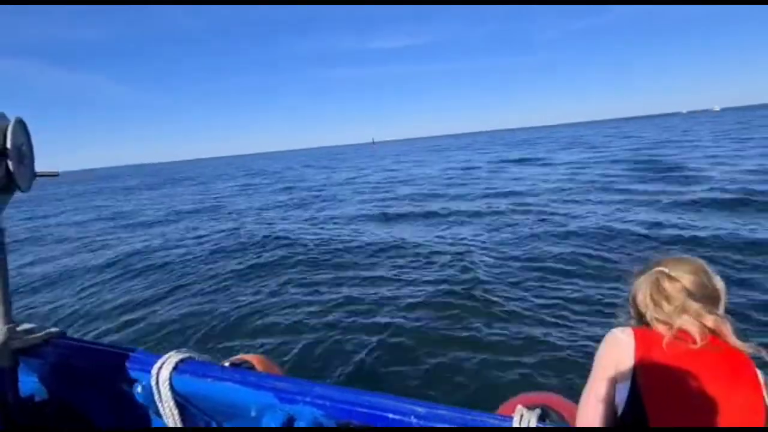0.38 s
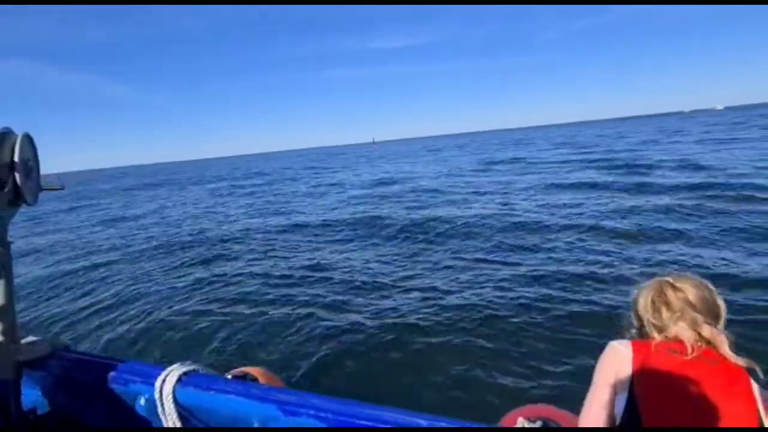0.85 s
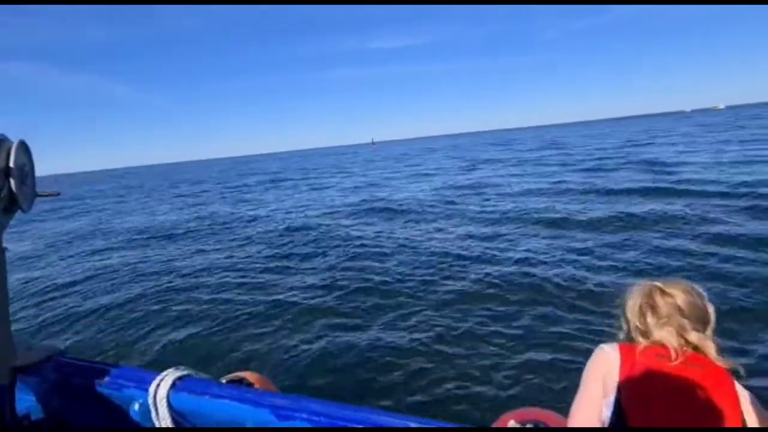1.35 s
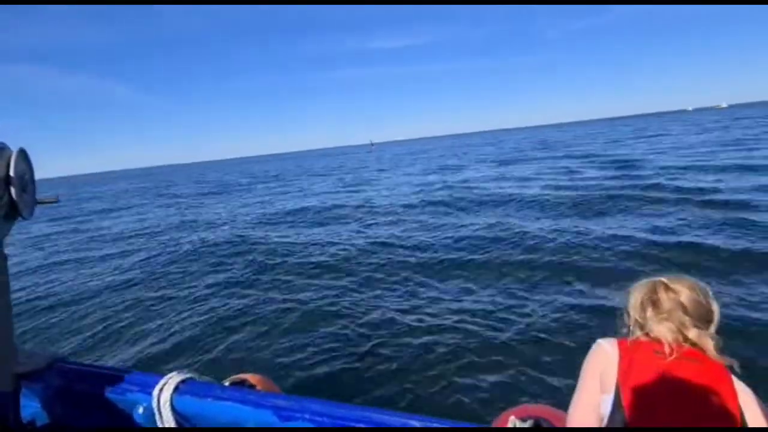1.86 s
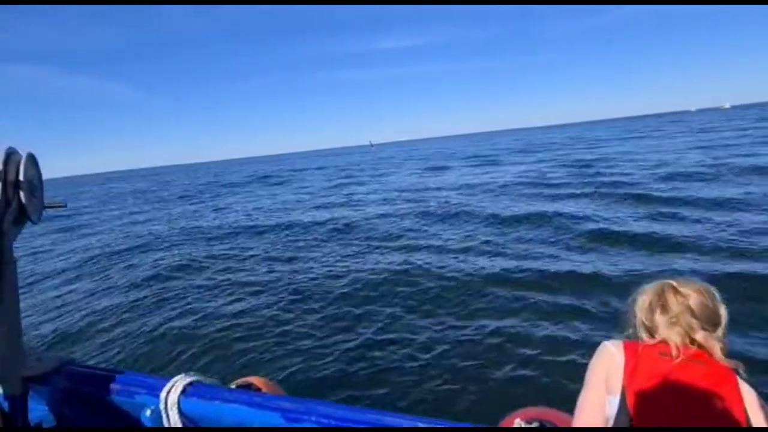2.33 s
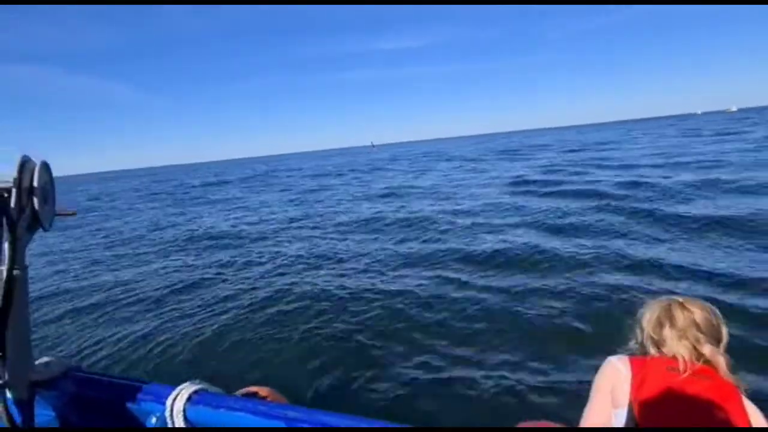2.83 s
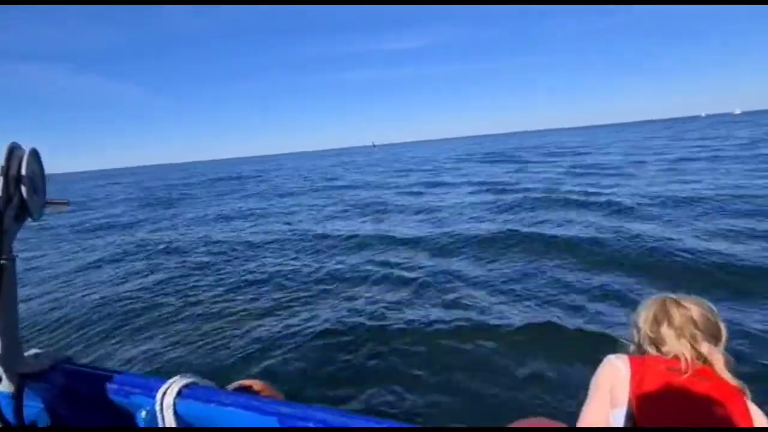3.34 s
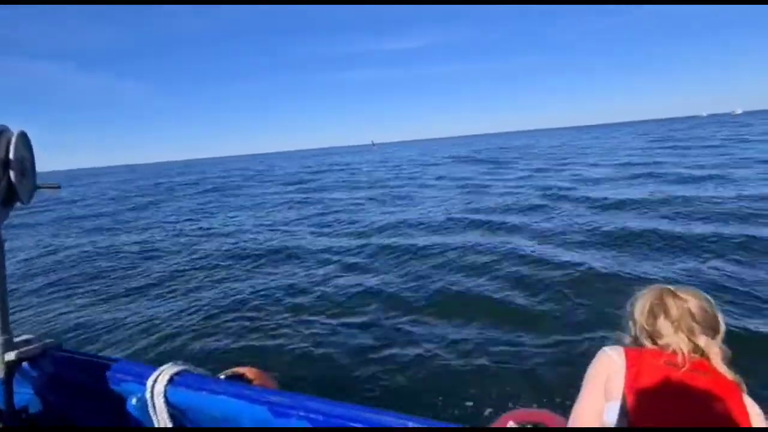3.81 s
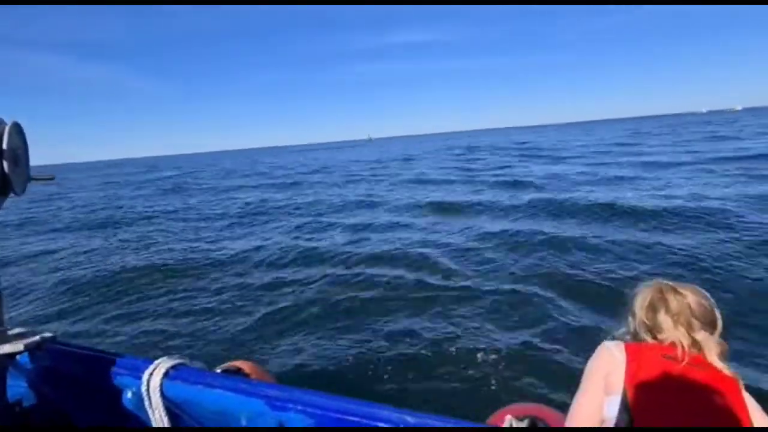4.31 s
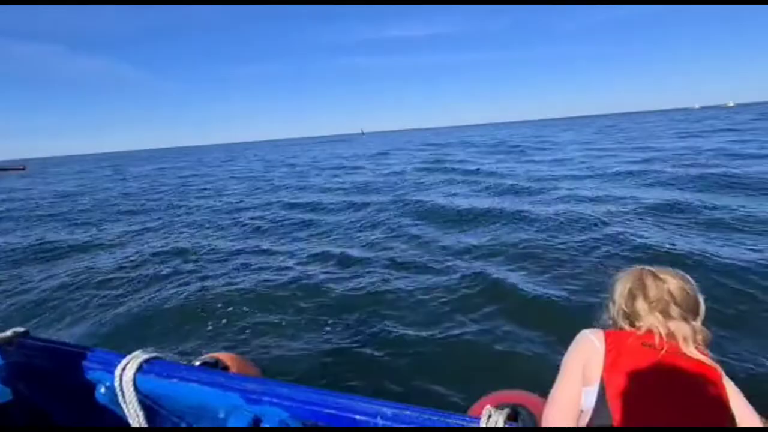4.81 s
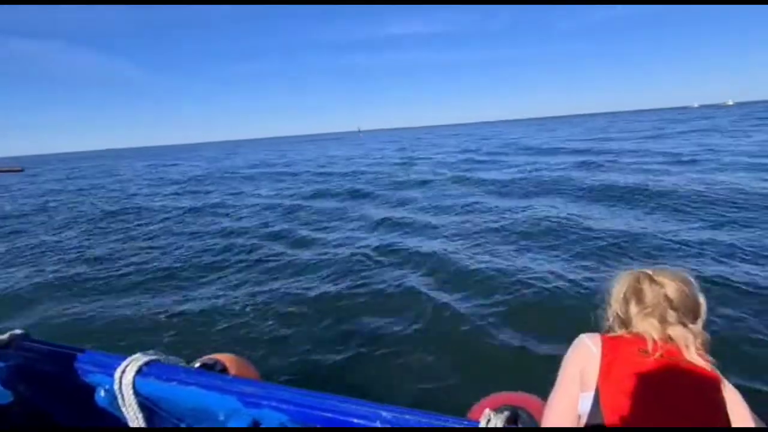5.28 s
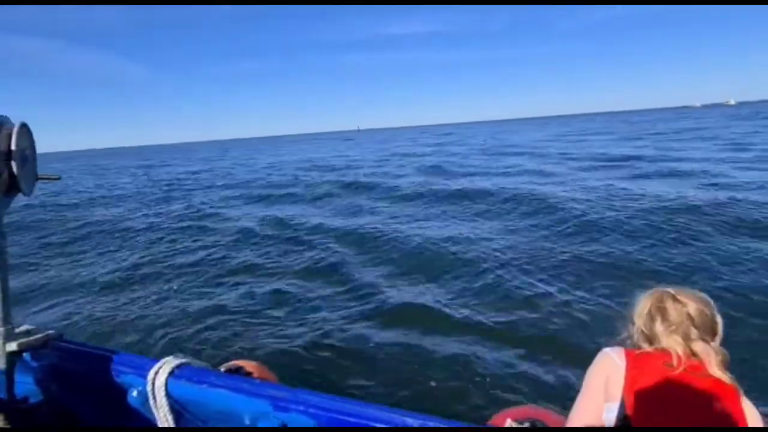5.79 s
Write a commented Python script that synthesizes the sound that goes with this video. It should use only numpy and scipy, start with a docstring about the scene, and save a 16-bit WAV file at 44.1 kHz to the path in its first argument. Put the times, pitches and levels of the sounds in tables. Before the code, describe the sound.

A small diesel engine runs without a break in an open boat at sea. Its fast, even firing merges into a buzzing low-mid drone with a slightly uneven pattern from cylinder to cylinder. Fine metallic valve clatter and a thin air hiss pulse along with it, and soft water and wind rumble lies underneath. The speed sags very slightly towards the end. Close stereo microphone aboard, outdoors and dry, brighter noise leaning right.

```python
"""Diesel in an open boat

A four-cylinder four-stroke diesel runs near 1240 rpm in an open boat on calm sea, slowly losing speed.
Each firing strikes damped modes of the block, exhaust and hull; valve clatter (noise and metal ticks) and
air hiss (noise) pulse in step with the firings. Water and wind rumble softly below, as flickering band noise,
over a soft mid-frequency noise floor. The engine sits nearer the right microphone port."""
import sys
import numpy as np
from scipy import signal
from scipy.io import wavfile

SR = 44100
rng = np.random.default_rng(int(sys.argv[2]) if len(sys.argv) > 2 else 0)


def invert_db(level):
    """Linear amplitude ratio for a level in decibels (20 dB per decade), elementwise."""
    return 10 ** (np.asarray(level, dtype=float) / 20)


def wav_out(sig):
    """Save sig, one row per channel (or a flat mono array), as 16-bit PCM at SR to the path in sys.argv[1]."""
    wavfile.write(sys.argv[1], SR, np.round(np.clip(np.atleast_2d(sig).T, -1, 1) * 32767).astype(np.int16))


N = 260631

# crankshaft speed: (time [s], speed [rpm])
CRANK_SPEED = [(0.0, 1243.49), (1.0, 1246.87), (2.0, 1246.43), (3.0, 1237.11), (4.0, 1226.71),
               (5.0, 1218.11), (5.91, 1205.46)]
PORT_SIGNS = np.array([[1], [-1]])  # left, right


def rms_one(x):
    """Normalisation: divide a signal by its root mean square."""
    return x / np.sqrt(np.mean(x ** 2) + 1e-20)


def in_time(rows):
    """Linear interpolation: columns of a time curve, one value per sample."""
    time_s, *columns = np.transpose(rows)
    return [np.interp(np.arange(N) / SR, time_s, column) for column in columns]


def at_hz(points, hz):
    """Interpolation on a log-frequency axis, as hearing spaces pitch."""
    points_hz, values = np.array(points).T
    return np.interp(np.log(hz), np.log(points_hz), values)


def drift(rate_hz):
    """Low-passed noise: a slow random fluctuation of spread 1, made at every 40th sample."""
    pole = np.exp(-2 * np.pi * rate_hz * 40 / SR)
    noise = rng.standard_normal(N // 40 + 2002)
    slow = signal.lfilter([1], [1, -2 * pole, pole * pole], noise)[2000:]
    return np.interp(np.arange(N) / 40, np.arange(len(slow)), rms_one(slow))


def pan_gains(difference_db):
    """Level difference between ports: half the decibels to the left, minus half to the right."""
    return invert_db(difference_db * PORT_SIGNS / 2)


def firings():
    """Phase integrates speed: cycles since the start; sample and cylinder of each firing, 1 s run-in first."""
    first_firing = .1247  # share of the two-turn cycle
    start_rpm = CRANK_SPEED[0][1]
    rpm = np.r_[np.full(SR, start_rpm), in_time(CRANK_SPEED)[0]]
    # a four-stroke cycle takes two turns, hence 120
    cycles = (np.cumsum(rpm) - SR * start_rpm) / SR / 120
    stroke = np.floor(4 * (cycles - first_firing)).astype(int)
    at = np.flatnonzero(np.diff(stroke)) + 1
    return cycles[SR:], at, stroke[at] % 4


def ring(clicks, hz, t60_s):
    """Damped resonator: a unit click sets off a decaying sine of starting height 1."""
    radius, turn = invert_db(-60 / (t60_s * SR)), 2 * np.pi * hz / SR
    poles = [1, -2 * radius * np.cos(turn), radius * radius]
    return signal.lfilter([0, np.sin(turn)], poles, clicks + 1e-18)


def engine(at, cylinder):
    """Modal excitation: each firing drives every mode by its shape at that cylinder; no two burns are alike."""
    # modes of hull and exhaust: (frequency [Hz], decay time t60 [s], level before the boost [dB],
    # drift as the boat swings [dB per s], left minus right [dB], then mode shape at cylinders 1 to 4 [-])
    hull_modes = [(40.9, 0.59, -34, 0.06, 4, 0.78, 0.56, 1.0, 0.025),
                  (80.5, 0.18, -19, -0.7, 0.5, 0.45, 0.57, 0.65, 0.94),
                  (144.4, 0.096, -16.0, 0, -2, -0.98, -0.79, -0.68, -0.57),
                  (157.7, 0.31, -23.5, 0.4, 0, 0.93, -0.022, 0.94, -0.025),
                  (168.86, 0.37, -18.5, 0.3, -0.8, 0.52, 0.88, 0.39, 0.41),
                  (207, 0.077, -10.5, -0.21, -1, 0.84, 0.78, 0.66, 1.0),
                  (231.5, 0.14, -17, -0.13, -0.5, -0.86, 1, 0.015, -0.77),
                  (251, 0.56, -36, 1.53, 8.5, 1.0, 0.37, 0.89, 0.47),
                  (261.6, 0.16, -16, 1.2, -0.2, -1.06, -0.52, -0.64, -0.5),
                  (278.6, 0.048, -12, 1, 0, 1.0, -0.21, -0.024, 0.06),
                  (293.1, 0.18, -25, 2, 3, -1.22, -0.17, -0.35, -0.52),
                  (341.04, 0.19, -14.5, -1.41, 9, 0.89, -0.36, 0.91, -0.63),
                  (346.7, 0.13, -9.5, -0.25, 2.5, -0.78, 0.36, -1.04, 0.74),
                  (372.4, 0.13, -16.5, 1.49, -0.5, 0.31, 0.37, 1.0, 0.05),
                  (386.4, 0.31, -35, 2.5, -6, -0.5, -1.09, -0.81, -0.51),
                  (413.3, 0.24, -28, -0.5, 4, -0.6, 0.48, -1.17, -0.1),
                  (443.7, 0.23, -42.5, 2.5, 3, 0.47, -1.1, -0.58, -0.65),
                  (468, 0.25, -19.5, -0.6, -2.5, 0.97, 0.93, 1.0, 0.88),
                  (511, 0.08, -33.5, 2.5, 5, 0.55, 0.34, 1.0, 0.39),
                  (515, 0.18, -31, 1.86, -3, -1.2, -0.42, -0.65, 0.74),
                  (526.8, 0.2, -18.5, 0.6, -4, 0.87, -0.54, 0.61, -0.46),
                  (542.6, 0.19, -19, -0.34, -6, 0.062, 0.92, 0.013, 0.49),
                  (560, 0.11, -25, -2, 12.5, 1.0, -0.94, 0.85, 0.64),
                  (585, 0.06, -15.5, 0, 3.5, -0.18, 0.91, -0.049, 0.068),
                  (622.4, 0.092, -21.5, -0.25, -11, -0.06, -0.93, -0.23, -0.79),
                  (632.4, 0.39, -27.5, 0.55, 8, -0.75, -0.83, -0.76, -0.87),
                  (634, 0.16, -40.5, 1.25, 5.5, 0.45, -0.8, 0.31, -0.58),
                  (697, 0.031, -22.5, -0.04, -0.5, -0.56, -1, -1.02, -0.56)]
    # modes of engine block and covers: (frequency [Hz], decay time t60 [s], level before the boost [dB],
    # drift as the boat swings [dB per s], left minus right [dB], then mode shape at cylinders 1 to 4 [-])
    block_modes = [(722, 0.048, -31, 0.5, -8, 0.19, 0.55, 0.76, 0.42),
                   (772, 0.032, -27, -1, -5.5, -1.56, -0.42, 0.97, -0.071),
                   (807, 0.17, -35, 0.7, 3, -0.85, -0.29, -0.89, 0.54),
                   (810, 0.21, -41, 0.1, -5, 0.032, 0.79, 0.39, 0.99),
                   (815, 0.2, -44, -1, -10.5, 0.24, -0.036, -0.8, -0.33),
                   (870, 0.086, -31.5, -0.34, 6, 0.93, -0.57, 0.52, -0.84),
                   (895, 0.21, -35.5, -0.47, 9.5, -1.06, -0.39, -1.08, -0.42),
                   (912, 0.19, -36.5, 0.26, -10, -0.64, -0.03, -0.2, -0.5),
                   (933, 0.32, -35.5, 1.3, -4.5, 0.28, -0.51, 0.38, -0.16),
                   (988, 0.071, -30, 0.5, -8.5, 0.56, -0.00053, 0.2, 0.28),
                   (1008, 0.13, -37.5, -1.05, 12.5, 0.67, -0.018, 0.58, 0.92),
                   (992, 0.096, -45, 1.5, -11, -0.91, -0.32, -0.34, -0.32),
                   (1040, 0.064, -31.5, -1.5, 8, -1.05, 0.8, -0.55, 0.036),
                   (1063, 0.079, -25.5, -1.6, -3, -0.61, 0.45, 1, 0.65),
                   (1066, 0.13, -31, 0.96, -5, 0.1, -0.27, -0.061, -0.97),
                   (1112, 0.27, -35.5, 0, 13.5, 0.00073, -0.049, 0.6, -0.1),
                   (1130, 0.26, -41, -0.5, 9.5, 0.6, 0.2, 0.096, -0.95),
                   (1147, 0.42, -39, 0, -5.5, -0.7, -0.73, 0.22, 0.68),
                   (1181, 0.64, -40, -0.5, -2, -0.41, -0.55, 0.56, 0.7),
                   (1245, 0.023, -34.5, 1.04, 9.5, -0.38, -0.73, -1.06, 0.3),
                   (1204, 0.089, -31, -1, 1, 0.25, 0.054, 1.0, 0.55),
                   (1250, 0.079, -27, -0.5, 2.5, 0.37, -0.24, -0.85, 0.67),
                   (1286, 0.19, -42, -0.2, 13, -0.62, -0.56, 0.7, -1.16),
                   (1303, 0.33, -39, 0.5, 4, 0.84, 0.97, 0.17, 0.056),
                   (1328, 0.058, -30.5, -1.4, -2, -0.53, 0.85, 0.75, -0.54),
                   (1366, 0.14, -33.5, -1.6, -1.5, 0.9, 0.87, -0.74, 0.58),
                   (1380, 0.1, -39, 2.5, -3, -0.37, -1.07, 0.13, 0.34),
                   (1423, 0.084, -26, -1.04, -2, -0.063, -1.2, -0.53, -1),
                   (1437, 0.15, -38, 1.1, -4, 0.47, 1, 1.0, 0.57),
                   (1540, 0.24, -51, 1, -4, -0.19, 0.24, 0.92, -0.55)]
    # (modes, boost [dB], spread of each blow on a mode [-],
    # steady shaking of loose parts and water against the plates [dB per sample against a blow])
    parts = (hull_modes, 0.6, 0.024, -56.5), (block_modes, 3.5, .06, -46.0)
    burn = 1 + 0.0067 * rng.standard_normal(len(at))
    shaking = rng.standard_normal((2, N + SR))
    seconds = np.arange(-SR, N) / SR
    out = 0
    for modes, boost_db, blow_spread, shake_db in parts:
        for k, (hz, t60_s, mode_db, drift_db, pan_db, *shape) in enumerate(modes):
            force = invert_db(shake_db) * shaking[k % 2]
            blow_luck = blow_spread * rng.standard_normal(len(at))
            force[at] += np.array(shape)[cylinder] * burn + blow_luck
            force *= invert_db(mode_db + boost_db + drift_db * seconds)
            out = out + ring(force, hz, t60_s)[SR:] * pan_gains(pan_db)
    # the pressure rise takes time, so the blow has little treble
    return signal.sosfilt(signal.butter(4, 1900, fs=SR, output="sos"), out)


def widen(x):
    """Stereo widening: faint delayed copies of the mid are added left and subtracted right."""
    # delayed copies of the mid: (delay [ms], level [dB])
    copies = [(2.1, -30.5), (4.7, -21), (7.9, -25.5)]
    mid = x.mean(axis=0)
    delayed = np.zeros(N)
    for delay_ms, copy_db in copies:
        lag = int(delay_ms * SR / 1000)
        delayed[lag:] += invert_db(copy_db) * mid[:-lag]
    return x + delayed * PORT_SIGNS


def banded_noise(spectrum, white, patchy_db, flicker_hz):
    """Filter bank: fifth-octave noise bands with own level, flicker, likeness and balance; mid rms 1."""
    # balance of the ports: (frequency [Hz], left minus right [dB])
    port_balance = [(60, -1), (700, -4.5), (1300, -1.5), (2400, -1.5), (4400, -9.5), (6000, -8.5),
                    (8100, 13), (11000, -10), (15000, 3)]
    # left-right likeness before the left port's lag: (frequency [Hz], correlation [-])
    likeness = [(30, 0.62), (100, .8), (700, 0.39), (1400, 0.3), (2000, 0.35), (3000, 0.062),
                (15000, 0.011)]
    low_hz, high_hz = spectrum[0][0], min(spectrum[-1][0], 17000)
    edges = np.geomspace(low_hz, high_hz, int(5 * np.log2(high_hz / low_hz)) + 1)
    out = 0
    together = drift(flicker_hz)  # shared by all bands
    for k, (low, high) in enumerate(zip(edges, edges[1:])):
        band = signal.butter(2, [low, high], "band", fs=SR, output="sos")
        mid, side = signal.sosfilt(band, white[k % 2])
        hz = np.sqrt(low * high)
        alike = np.clip(at_hz(likeness, hz), 0, 1)
        flicker_db = patchy_db * (together + 0.36 * drift(flicker_hz))
        gain = invert_db(at_hz(spectrum, hz) + flicker_db)
        ports = np.sqrt(1 + alike) * mid + np.sqrt(1 - alike) * side * PORT_SIGNS
        out = out + gain * pan_gains(at_hz(port_balance, hz)) * ports
    return out / np.sqrt(np.mean(out.mean(axis=0) ** 2))


def noise_and_ticks():
    """Impulsive noise: steady white noise mixed with metal ticks of uneven height at random instants."""
    ticks_per_s, size_db, tick_share = 400., 5.6, 0.086  # share of the power
    struck = rng.random((2, N)) < ticks_per_s / SR
    height = invert_db(size_db * np.minimum(rng.exponential(1, (2, N)), 5))
    ticks = rms_one(struck * height * rng.choice([-1, 1], (2, N)))
    white = rng.standard_normal((2, 2, N))
    return np.sqrt(1 - tick_share) * white + np.sqrt(tick_share) * ticks


def valve_contacts(cycles):
    """Amplitude modulation: the gain shifts briefly at each contact, by a new amount in every cycle."""
    # valve and injector contacts: (share of the cycle [-], typical level over the steady clatter [dB])
    contacts = [(.095, 6), (.165, 4.5), (.2, 5), (.245, 3), (.35, 5.5), (.43, 6), (.515, 4), (.6, -0.5),
                (.665, 4), (0.852, 4.5), (0.894, 5.5), (.93, 4), (.98, -7)]
    lead, rise, fall = 0.0033, 0.0027, 0.018  # shares of the cycle
    gain = np.ones(N)
    for share, contact_db in contacts:
        turn = np.round(cycles - share)
        since = cycles - share - turn + lead
        luck = invert_db(0.5 * rng.standard_normal(100))[turn.astype(int) % 100]
        pulse = np.exp(-.5 * (since / np.where(since < 0, rise, fall)) ** 2)
        gain += (invert_db(contact_db) - 1) * luck * pulse
    return rms_one(gain)


def valve_clatter(cycles):
    """Impact noise: band-shaped noise and ticks pulse at the valve contacts."""
    # (frequency [Hz], relative density [dB per Hz])
    clatter_spectrum = [(1300, -32), (1500, -8.5), (1700, -1.5), (2000, -7), (2300, -6.5), (2800, -12),
                        (3400, -10.5), (4000, -19), (5000, -25)]
    # the clatter eases for a while: (time [s], level [dB])
    clatter_curve = [(0.0, -38), (1.7, -37.5), (3.8, -38.5), (5.2, -37), (5.91, -38)]
    noise = banded_noise(clatter_spectrum, noise_and_ticks(), patchy_db=0.68, flicker_hz=14.0)
    return noise * invert_db(in_time(clatter_curve)[0]) * valve_contacts(cycles)


def bursts(cycles):
    """Amplitude modulation: a gain that swells smoothly, peaking shortly after each firing."""
    # swell of air noise by cylinder: (typical level over the steady part [dB])
    swells = [2, 3.9, 1.7, 1.18]
    centre = 0.17  # share of the cycle
    strokes = 4 * (cycles - centre) + .5
    stroke = np.floor(strokes).astype(int)
    luck_db = 0.44 * rng.standard_normal(400)[stroke % 400]
    swell_db = (np.array(swells)[stroke % 4] + luck_db) * np.sin(np.pi * strokes) ** 2
    return rms_one(invert_db(swell_db))


def air_hiss(cycles):
    """Flow noise: broadband hiss swells with the firings and sinks with the engine speed."""
    # (frequency [Hz], relative density [dB per Hz])
    hiss_spectrum = [(2500, -5.5), (2900, 3), (3400, -2), (3900, -2), (5000, -0.5), (5900, 4.5),
                     (6600, -7.5), (7600, -18), (9000, -7.5), (11000, -7.5), (12500, -2.5), (13800, -5),
                     (15000, -12), (15700, -16)]
    start_db, db_per_rpm = -37.5, 0.05  # level at the starting speed
    hiss_db = start_db + db_per_rpm * (in_time(CRANK_SPEED)[0] - CRANK_SPEED[0][1])
    noise = banded_noise(hiss_spectrum, rng.standard_normal((2, 2, N)), patchy_db=0.64, flicker_hz=7.3)
    return noise * invert_db(hiss_db) * bursts(cycles)


def water_and_wind():
    """Turbulence noise: a soft, flickering low-frequency rumble."""
    # (frequency [Hz], relative density [dB per Hz])
    rumble_spectrum = [(24, -16), (33, 6), (45, 4), (60, 6.5), (80, 5), (120, -3.5), (170, -11), (260, -33)]
    white = rng.standard_normal((2, 2, N))
    return invert_db(-32) * banded_noise(rumble_spectrum, white, patchy_db=0.5, flicker_hz=4.9)


def noise_floor():
    """Band-limited noise: a soft mid-frequency noise floor of fluctuating level."""
    # (frequency [Hz], relative density [dB per Hz])
    floor_spectrum = [(260, -4), (450, 7.5), (650, -0.5), (900, -7.5), (1400, -17)]
    white = rng.standard_normal((2, 2, N))
    return invert_db(-34) * banded_noise(floor_spectrum, white, patchy_db=1.5, flicker_hz=5.1)


def scene():
    """Superposition: engine, clatter, hiss, rumble and noise floor add at two ports, the left one lagging."""
    cycles, at, cylinder = firings()
    body = widen(engine(at, cylinder))
    clatter = valve_clatter(cycles)
    hiss = air_hiss(cycles)
    left, right = body + clatter + hiss + water_and_wind() + noise_floor()
    left_lag = 20  # samples
    return np.array([np.roll(left, left_lag), right])


def low_pass(x):
    """Removes everything above the highest recorded frequency."""
    return signal.sosfilt(signal.butter(12, 15720, fs=SR, output="sos"), x)


def record(dry):
    """High-pass response: the microphone drops the deepest bass, below 25 Hz."""
    heard = signal.sosfilt(signal.butter(2, 25, "high", fs=SR, output="sos"), dry)
    return low_pass(heard)


dry = scene()
out = record(dry)
wav_out(out)
```